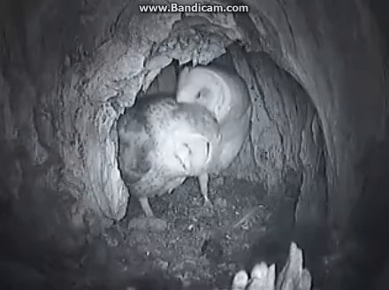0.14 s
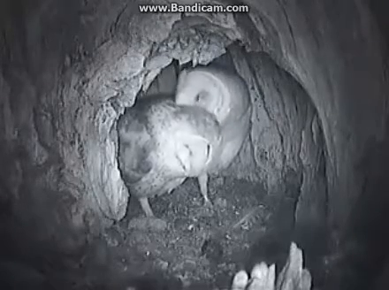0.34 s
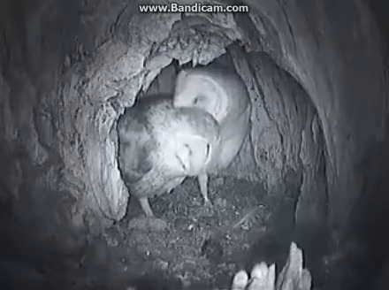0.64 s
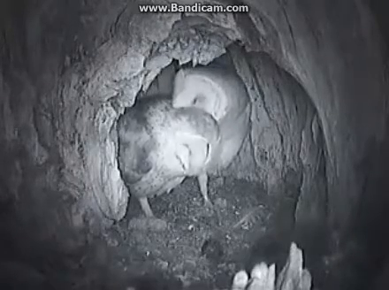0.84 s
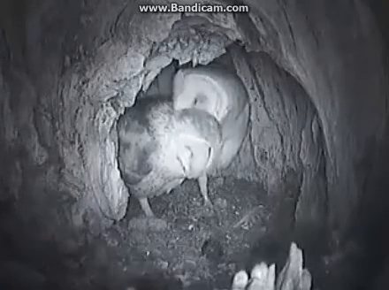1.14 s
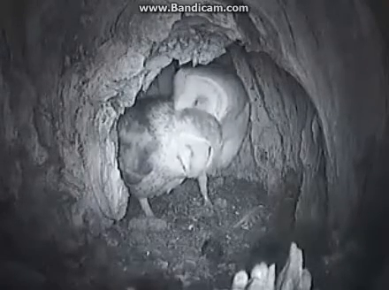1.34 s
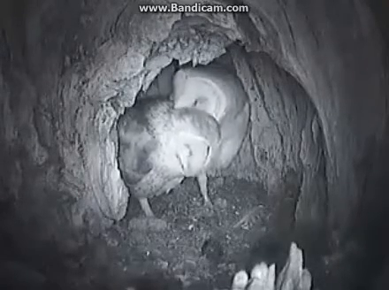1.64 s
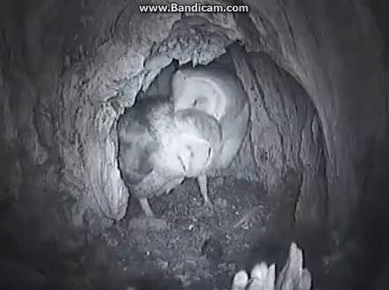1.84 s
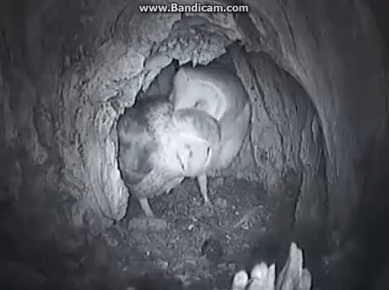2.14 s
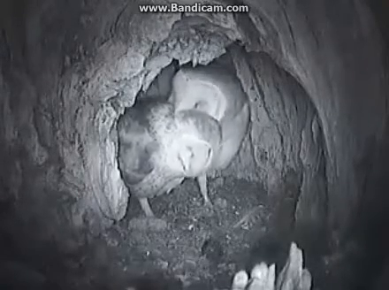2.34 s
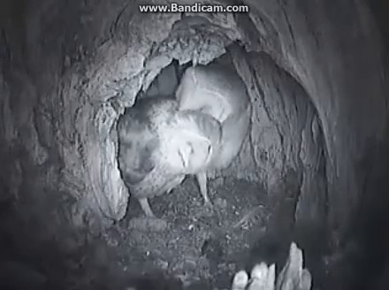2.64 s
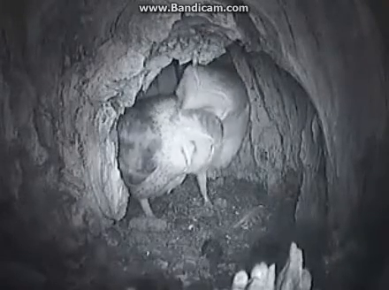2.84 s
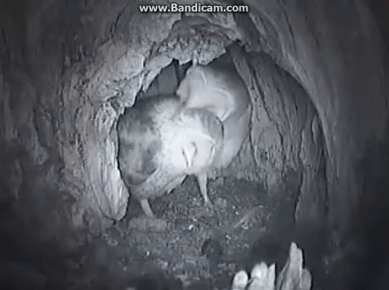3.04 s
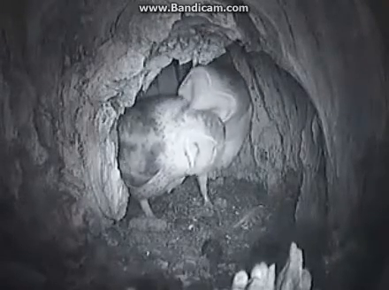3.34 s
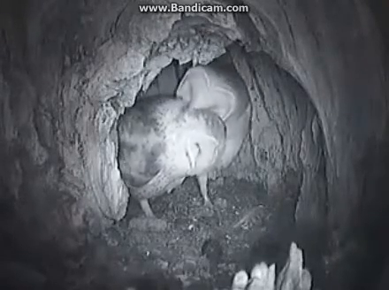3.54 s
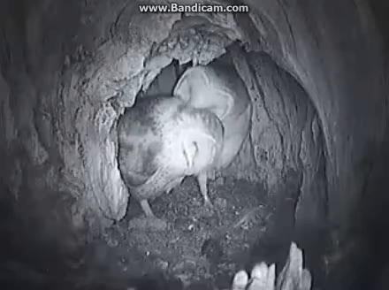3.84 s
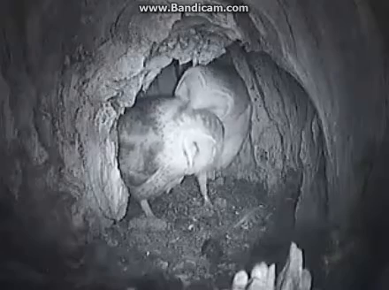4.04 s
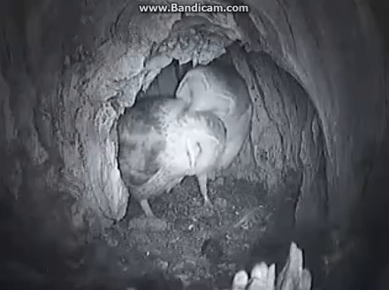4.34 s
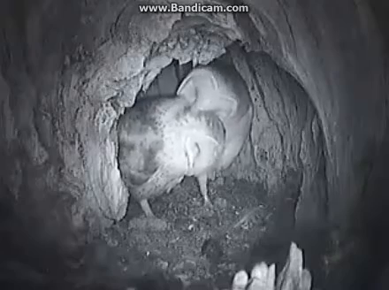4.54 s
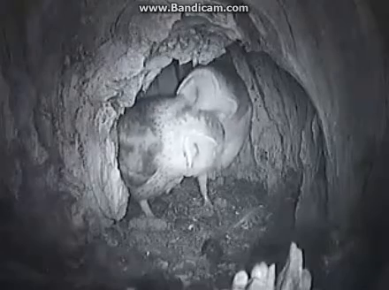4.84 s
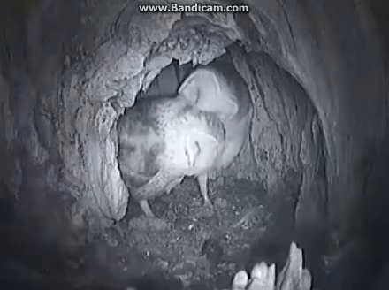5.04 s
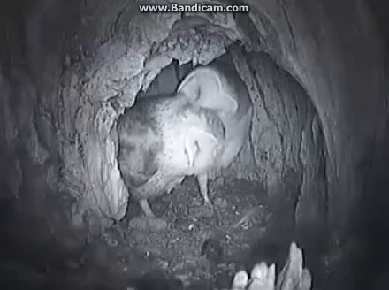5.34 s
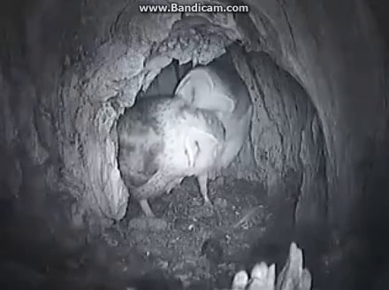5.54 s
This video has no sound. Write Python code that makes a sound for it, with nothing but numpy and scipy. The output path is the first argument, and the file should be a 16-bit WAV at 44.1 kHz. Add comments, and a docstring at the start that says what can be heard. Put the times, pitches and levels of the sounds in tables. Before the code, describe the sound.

A nest microphone's constant hiss and mains hum cover low air rumble and faint rustles, dipping briefly and then coming up louder.

```python
"""Nest-box camera microphone

Two owls sit silently in front of it. Mains buzz from the power supply, amplifier hiss and a fluttering treble
lie over a dull, wandering rumble of air in the hollow, with faint rustles, peeps and bumps. The sound skips
once with a tick; near four seconds it all sags, then comes up louder."""
import sys
import numpy as np
from scipy import signal
from scipy.fft import rfft, irfft
from scipy.io import wavfile

SR = 44100
rng = np.random.default_rng(int(sys.argv[2]) if len(sys.argv) > 2 else 0)


def persist_wave(psi):
    """Save psi, clipped to +-1, as 16-bit WAV."""
    counts = np.round(np.clip(psi, -1, 1) * 32767).astype(np.int16)
    wavfile.write(sys.argv[1], SR, np.atleast_2d(counts).T)


N = 251370
T = np.arange(N) / SR
BINS = np.fft.rfftfreq(N, 1 / SR)

SKIP_AT_S, SKIP_LENGTH_S = 3.124, 0.0232
RISE_AT_S, RISE_LENGTH_S = 3.894, 0.15


def gain_of(db):
    """Decibels to amplitude."""
    return 10 ** (np.asarray(db) / 20)


def ramp(start_s, length_s):
    """Goes evenly from 0 to 1 and stays there."""
    return np.clip((T - start_s) / length_s, 0, 1)


def bell(crest_s, half_width_s):
    """A smooth swell that peaks at 1."""
    return np.exp(-((T - crest_s) / half_width_s) ** 2)


def noise(shape):
    """Noise of rms 1 with the given magnitude spectrum."""
    x = irfft(rfft(rng.standard_normal(N)) * shape, N)
    return x / x.std()


def coloured(points):
    """Noise whose spectrum joins (Hz, relative dB) points and ends at the last one."""
    hz, db = np.transpose(points)
    curve_db = np.interp(np.log(BINS + 1), np.log(hz + 1), db)
    return noise(gain_of(curve_db) * (BINS < hz[-1]))


def band(hz, width_hz, db):
    """Noise in one steep-sided resonance."""
    return gain_of(db) * noise(1 / (1 + ((BINS - hz) / width_hz) ** 2) ** 2)


def drift(rate_hz):
    """Random wandering of rms 1, mostly slower than rate_hz."""
    return noise(1 / (1 + (BINS / rate_hz) ** 4) * (BINS > 1))


def lowpass(x, hz):
    """Steep low-pass of every channel."""
    taps = signal.firwin(601, hz, window=("kaiser", 9), fs=SR)
    return signal.oaconvolve(x, taps[None], "same")


def blips(rows, wander_hz, rough_db):
    """Brief, unsteady tones that barely rise out of the noise."""
    wander_turns = np.cumsum(wander_hz * drift(rate_hz=47)) / SR
    tones = np.zeros(N)
    for crest_s, hz, length_s, db in rows:
        swell = np.cos(np.pi * np.clip((T - crest_s) / length_s, -0.5, 0.5))
        tones += gain_of(db) * swell * np.sin(2 * np.pi * (hz * T + wander_turns))
    return np.sqrt(2) * tones * gain_of(rough_db * drift(rate_hz=110))


def peeps():
    """Faint, grainy peeps in the hiss."""
    # Each row: crest in seconds, pitch in Hz, length in seconds, level in dB.
    notes = [(0.283, 5420, 0.045, -45), (1.285, 5400, .1, -48), (2.175, 5330, 0.06, -47),
             (3.263, 1975, 0.03, -38.5), (5.183, 5330, 0.026, -42), (5.6, 5320, 0.029, -43)]
    return blips(notes, wander_hz=28, rough_db=4)


def bumps():
    """Soft, low bumps in the rumble."""
    # Each row: crest in seconds, pitch in Hz, length in seconds, level in dB.
    notes = [(0.63, 343.5, 0.11, -30.5), (2.138, 121.7, 0.062, -25), (4.45, 72, 0.07, -29),
             (5.63, 190, 0.11, -27.5)]
    return blips(notes, wander_hz=11.5, rough_db=0)


def rustles_and_hiss_swell():
    """The short bands rustle; in the long one, hiss swells slowly around 3 kHz after the step up."""
    # Each row: crest and half width in seconds, centre and width in Hz, level in dB.
    noise_bands = [(3.33, 0.078, 2200, 887, -42), (3.58, 0.049, 1990, 900, -42),
                   (4.201, 0.26, 943, 400, -42.5), (4.25, 0.16, 2500, 1518, -45),
                   (5.3, 0.8, 3250, 650, -45.5), (5.535, 0.035, 5400, 850, -40)]
    return sum(band(hz, width_hz, db) * bell(crest_s, half_width_s)
               for crest_s, half_width_s, hz, width_hz, db in noise_bands)


def rumble(spectrum, swells, rest_db, wander_db, wander_rate_hz):
    """One layer of air noise, swelling slowly and wavering a little."""
    swell_db = sum(db * bell(crest_s, half_width_s) for crest_s, half_width_s, db in swells)
    return coloured(spectrum) * gain_of(rest_db + swell_db + wander_db * drift(wander_rate_hz))


def hollow_air():
    """Dull air noise swells in the hollow, over a deeper rumble."""
    # Tone of each layer. Each row: frequency in Hz, relative level in dB.
    dull_spectrum = [(20, -34), (80, -10.5), (130, -5), (190, 1.5), (245, -3), (285, -0.5), (345, -3.5),
                     (390, -6), (470, -7), (600, -15), (900, -33.5), (2000, -48)]
    deep_spectrum = [(8, -24), (25, -18), (50, -8), (75, -3.5), (105, 1), (140, -4.5), (220, -16),
                     (500, -46)]
    # Swells of each layer. Each row: crest in seconds, half width in seconds, rise in dB.
    dull_swells = [(0.98, 0.82, 8), (2.5, 0.63, 5), (5.65, 0.6, 4.5)]
    deep_swells = [(2.05, 1, 3), (4.36, 0.2, 4.5), (4.87, 0.32, 5.5)]
    dull = rumble(dull_spectrum, dull_swells, rest_db=-35.5, wander_db=0.15, wander_rate_hz=9.3)
    deep = rumble(deep_spectrum, deep_swells, rest_db=-37, wander_db=-0.4, wander_rate_hz=4)
    return dull + deep


def drone():
    """A broad resonance wanders through the rumble: low noise shifted up to a gliding centre."""
    # Each row: time in seconds, centre in Hz, level in dB.
    path = [(0, 139.6, -31.5), (0.38, 260, -39.5), (.8, 335, -35), (1.1, 225, -32), (1.449, 245.1, -34),
            (1.901, 134.4, -33), (2.4, 170.1, -37.5), (2.85, 200, -34.5), (3.3, 125, -36.5),
            (3.8, 160, -46), (4.379, 195, -34.5), (4.56, 205, -44), (4.72, 190, -37), (4.999, 200, -39),
            (5.298, 205, -34.5), (5.7, 221.1, -31.5)]
    times, hz, db = np.transpose(path)
    half_width_hz = 69
    carrier = np.exp(2j * np.pi * np.cumsum(np.interp(T, times, hz)) / SR)
    low_noise = drift(half_width_hz) + 1j * drift(half_width_hz)
    return (carrier * low_noise).real * gain_of(np.interp(T, times, db))


def amplifier_hiss():
    """Even amplifier noise up to about 4 kHz."""
    # Each row: frequency in Hz, relative level in dB.
    spectrum = [(20, -10), (150, 2.5), (700, 1.5), (1300, 0.33), (2200, -1.1), (3450, -1.8), (3650, 2),
                (3800, 2.5), (3995, 1.4), (4015, -17), (4400, -38)]
    return coloured(spectrum) * gain_of(-34 + 0.25 * drift(rate_hz=20))


def treble_flutter(clock):
    """The treble above 4 kHz flutters quickly and unevenly, and a narrow sizzle wavers in it."""
    # Each row: frequency in Hz, relative level in dB.
    spectrum = [(3970, -40.5), (4005, 2.5), (4300, 0.7), (4750, -3), (5150, -1.1), (5650, -4.5), (6000, -6),
                (6340, -7.8), (6385, -3.5), (7270, -3.5), (7325, -28), (7700, -33.5), (8000, -37)]
    flutter_hz = 31.25
    flutter_db = -1.9 * np.sin(2 * np.pi * flutter_hz * clock) + 0.98 * drift(rate_hz=84)
    fizz = coloured(spectrum) * gain_of(-44.5 + 1.46 * drift(rate_hz=30))
    sizzle = band(hz=5497, width_hz=280, db=-50.5) * gain_of(2 * drift(rate_hz=31))
    return (fizz + sizzle) * gain_of(flutter_db)


def mains_buzz(clock):
    """The power supply draws a short pulse of current at each mains crest, plus and minus by turns."""
    # Odd harmonics. Each row: multiple of the mains frequency, level in dB.
    harmonics = [(1, -39), (3, -38.5), (5, -36.5), (7, -38), (9, -44), (11, -50.5), (13, -58), (15, -52.5),
                 (17, -55), (19, -63.5), (23, -61.5), (25, -61.5), (27, -63.5), (29, -64), (31, -65),
                 (33, -66), (35, -63)]
    # The buzz brightens slightly as the level steps up. Each entry: multiple, change in dB.
    brightening_db = {3: 1, 5: -0.7, 11: 2.2, 13: 1.7, 15: 1.5}
    mains_hz, first_pulse_s, pulse_share = 59.98, 0.0147, 0.083
    turns = mains_hz * (clock - first_pulse_s)
    risen = ramp(RISE_AT_S, RISE_LENGTH_S)
    buzz = np.zeros(N)
    for k, db in harmonics:
        gain = gain_of(db + brightening_db.get(k, 0) * risen)
        polarity = np.sign(np.sinc(k * pulse_share))  # a square-edged pulse flips sign lobe by lobe
        buzz += gain * polarity * np.cos(2 * np.pi * k * turns)
    return np.sqrt(2) * buzz * gain_of(0.7 * drift(rate_hz=11))


def overall_level():
    """Gain on top of every source's own level: steady, a brief sag, then a step up that holds."""
    sag_db, final_db = -2.5, 6
    sag = sag_db * ramp(start_s=3.645, length_s=0.11)
    rise = (final_db - sag_db) * ramp(RISE_AT_S, RISE_LENGTH_S)
    return gain_of(sag + rise)


def scene():
    """All sources ride one level in mono; at the skip, buzz and flutter jump ahead in their cycles."""
    clock = T + SKIP_LENGTH_S * (T > SKIP_AT_S)
    background = peeps() + bumps() + rustles_and_hiss_swell() + hollow_air() + drone()
    electronics = amplifier_hiss() + treble_flutter(clock) + mains_buzz(clock)
    return ((background + electronics) * overall_level())[None]


def record(dry):
    """The camera's narrow audio band; the skip leaves a tiny tick that reaches above it."""
    narrow = lowpass(dry, hz=8000)
    tick = gain_of(-31) * (np.arange(N) == round(SKIP_AT_S * SR))
    return lowpass(narrow + tick, hz=16000)


dry = scene()
out = record(dry)
persist_wave(out)
```